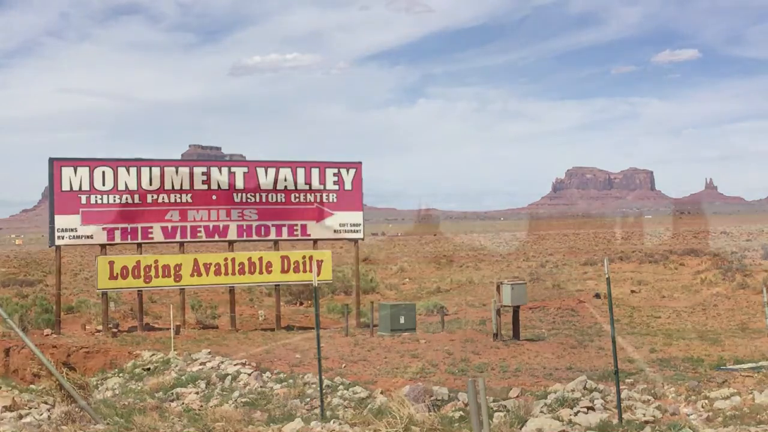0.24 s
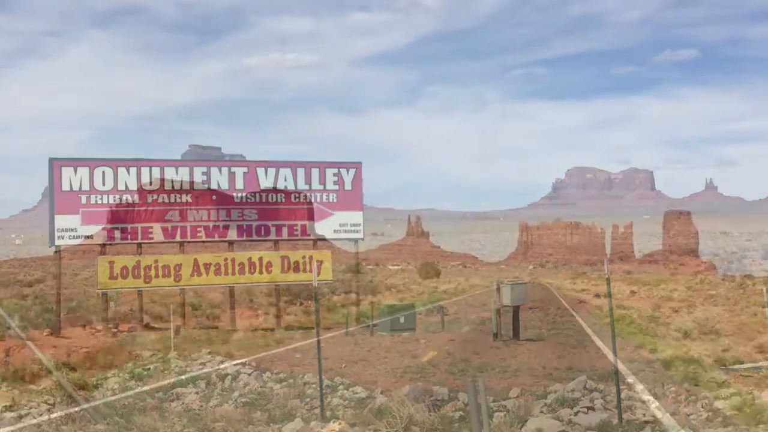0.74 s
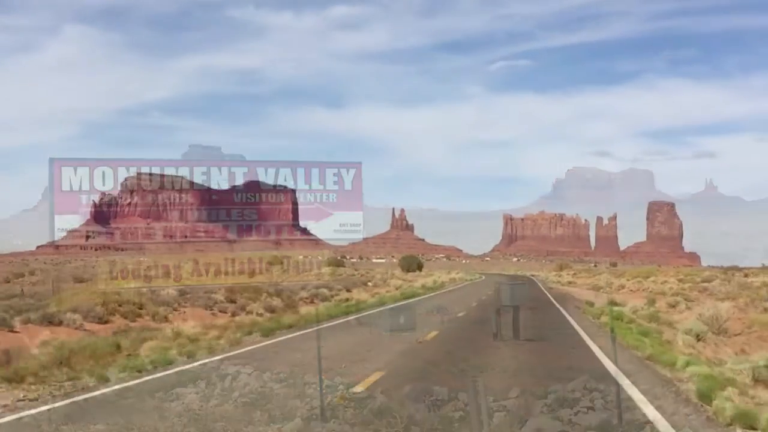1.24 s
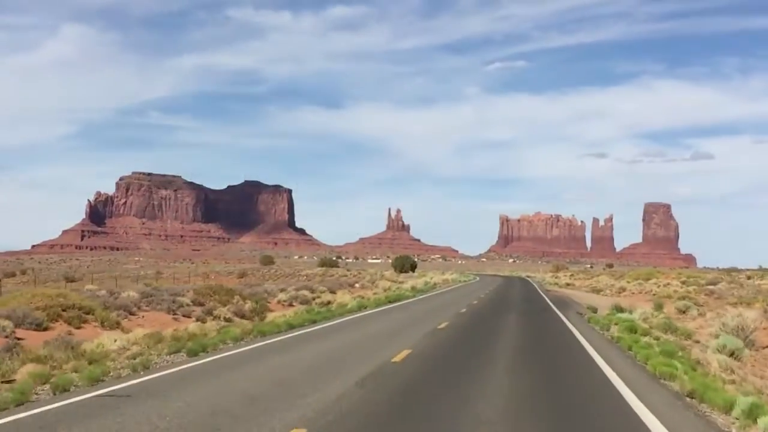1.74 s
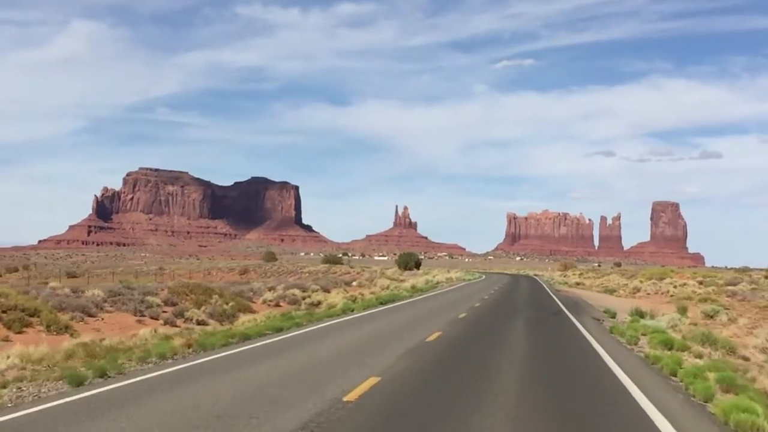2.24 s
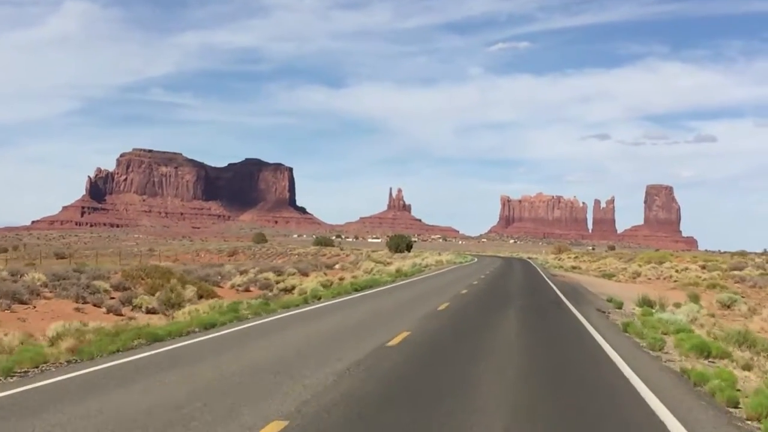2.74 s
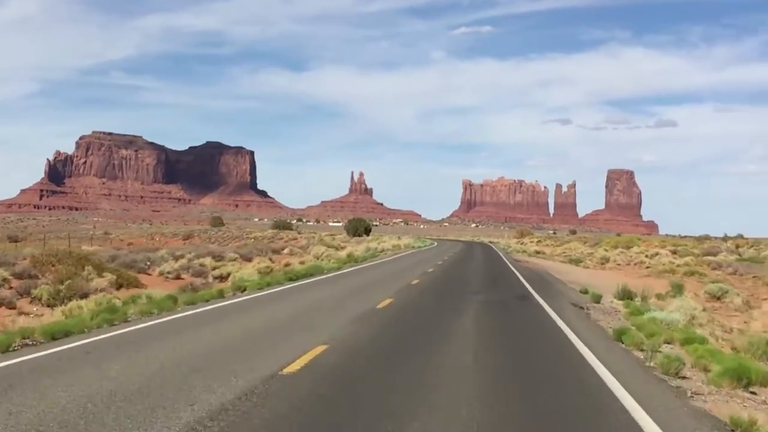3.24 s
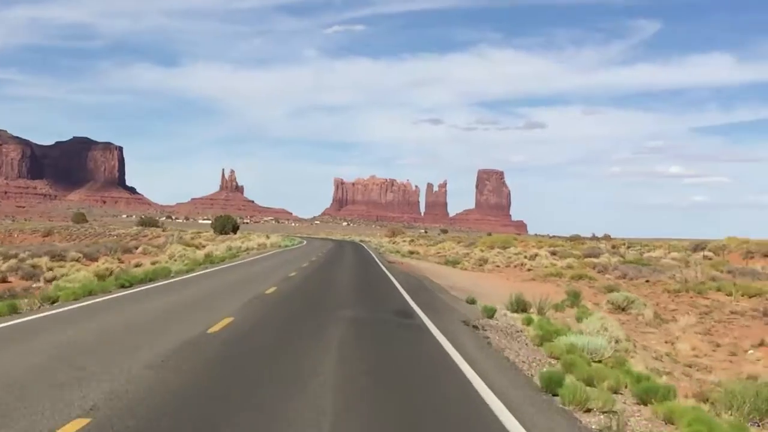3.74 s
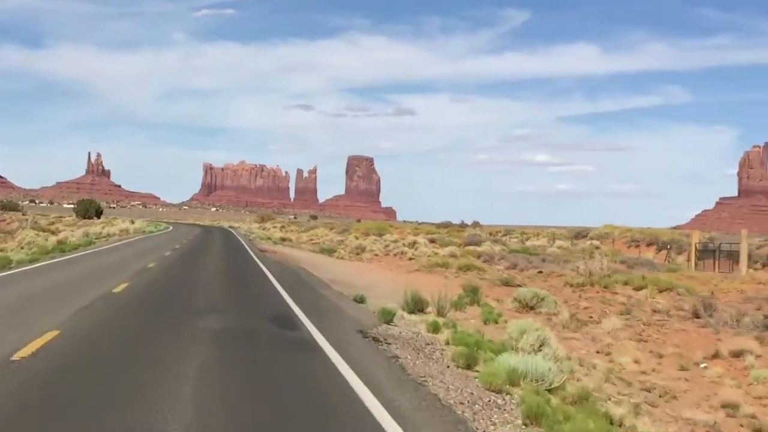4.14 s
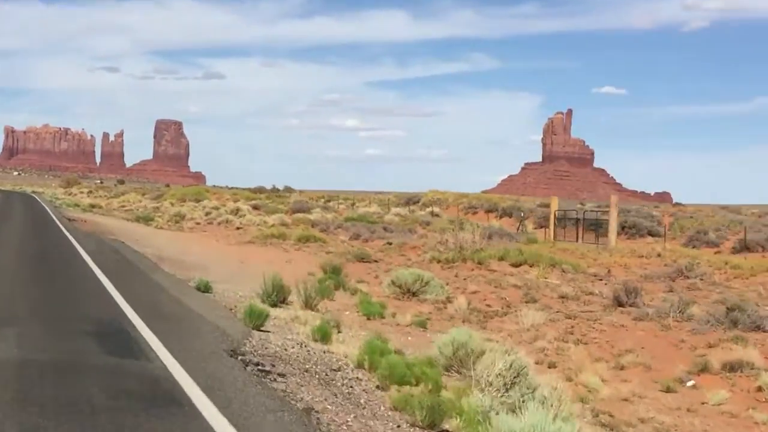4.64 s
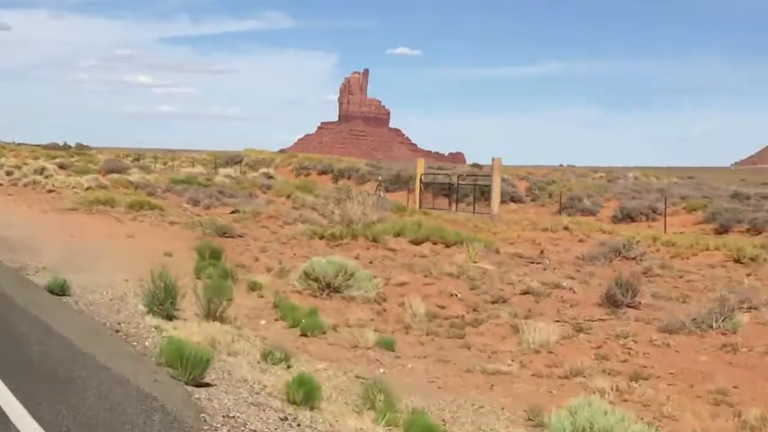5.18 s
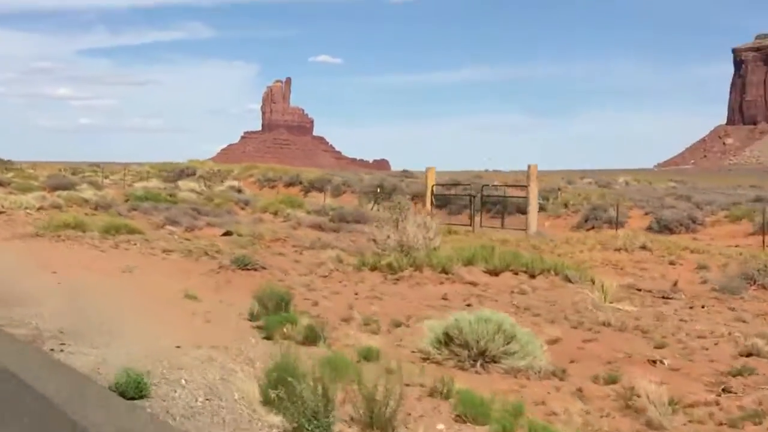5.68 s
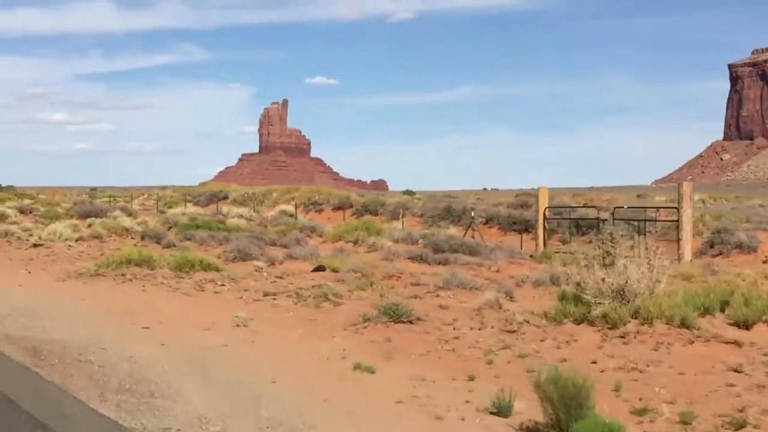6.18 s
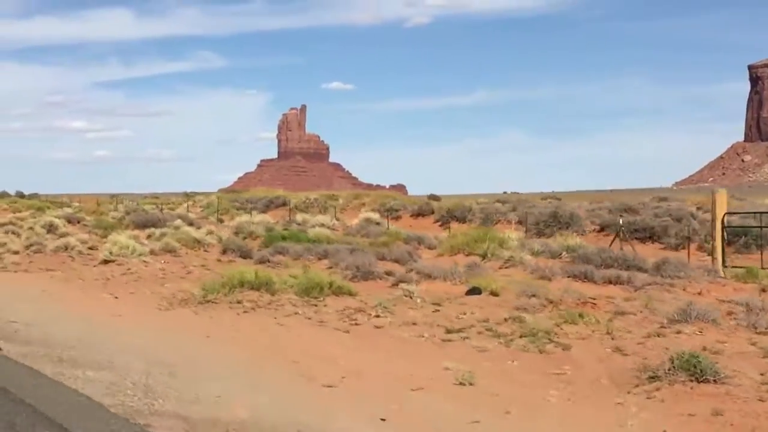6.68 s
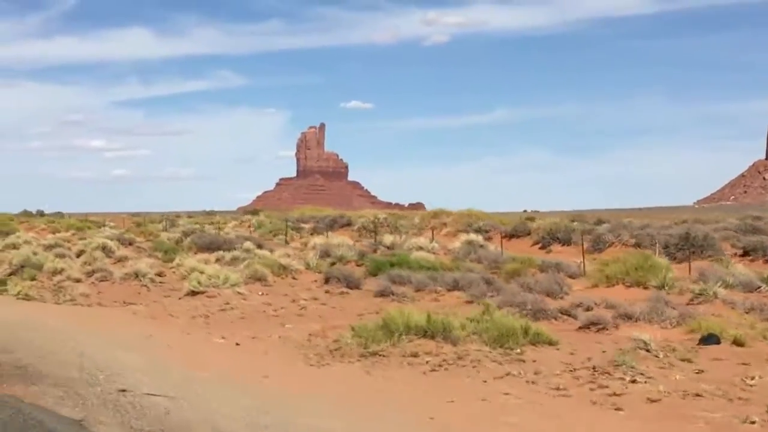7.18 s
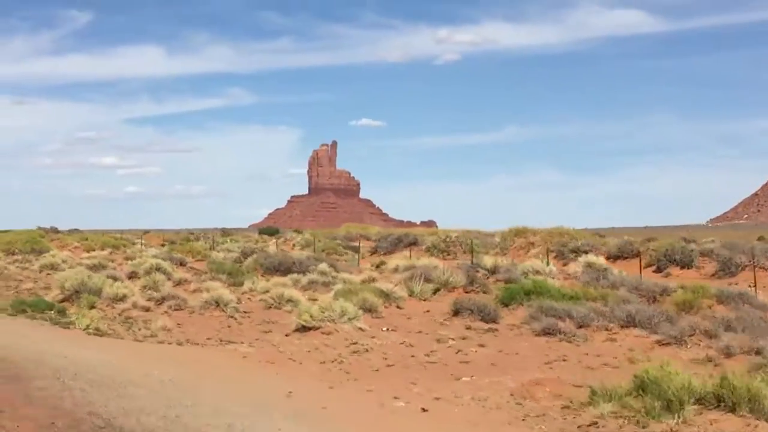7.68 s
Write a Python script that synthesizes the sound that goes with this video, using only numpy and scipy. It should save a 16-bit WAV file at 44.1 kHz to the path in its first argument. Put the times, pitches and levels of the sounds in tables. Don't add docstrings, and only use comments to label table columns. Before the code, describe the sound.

Heard from a phone held by the rider: silence, then a smooth rise of even motorcycle drone, low and pulsing, with road noise and fine metallic clatter. Small dull puffs of wind come singly. Then a sudden switch to exposed microphone; the machine sinks back, and a lumpy, crackling wind rush swells over it in irregular gusts with brief lulls. Open outdoors, no echo.

```python
import sys
import numpy as np
from scipy import signal
from scipy.fft import rfft, irfft
from scipy.io import wavfile

SR = 44100
rng = np.random.default_rng(int(sys.argv[2]) if len(sys.argv) > 2 else 0)


def unload_audio(sound):
    columns = np.transpose(np.atleast_2d(sound))
    steps = np.round(np.clip(columns, -1, 1) * 32767)
    wavfile.write(sys.argv[1], SR, steps.astype(np.int16))


def voltage_ratio(decibels):
    exponent = np.asarray(decibels, float) / 20
    return 10 ** exponent


N = 349124
START_S, FULL_S, CHANGE_S = 0.78, 1.814, 4.388


def rms_one(x):
    return x / np.sqrt(np.mean(x ** 2) + 1e-20)


def in_time(rows):
    s, *columns = np.transpose(rows)
    return [np.interp(np.arange(N) / SR, s, column) for column in columns]


def drift(rate):
    r = np.exp(-40 * np.pi * rate / SR)
    noise = rng.standard_normal(N // 20 + 4002)
    slow = signal.lfilter([1], [1, -2 * r, r * r], noise)[4000:]
    return np.interp(np.arange(N) / 20, np.arange(len(slow)), rms_one(slow))


def coloured(spectrum, pops_per_s=0, pop_db=0):
    hz, db = np.transpose(spectrum)
    grid = np.arange(1, N // 2 + 2) * SR / N
    shape = voltage_ratio(np.interp(np.log(grid), np.log(hz), db, left=-120, right=-120))
    pop_sizes = voltage_ratio(pop_db + 3.5 * np.minimum(rng.exponential(1, N), 2.5))
    pops = (rng.random(N) < pops_per_s / SR) * pop_sizes
    noise = rng.standard_normal(N) * (1 + pops)
    return rms_one(irfft(rfft(noise) * shape, N))


def patchy(x, patchy_db, rate, sway_db=0, sway_per_octave=0):
    hz, spread, out = np.arange(1, N // 2 + 2) * SR / N, rfft(x), 0
    steps = 2 * np.log2(hz / 20)
    for k in range(20):
        band = irfft(spread * np.clip(1 - abs(steps - k), 0, 1), N)
        band_sway_db = sway_db * sway_per_octave * max(k / 2 - 5.2, 0)
        out = out + band * voltage_ratio(patchy_db * drift(rate) + band_sway_db)
    return out


def bursts(events, rise_share=0.33):
    out = np.zeros(N + SR)
    for s, db, length_s in events:
        rise = int(2 * rise_share * length_s * SR)
        fall = int(2 * (1 - rise_share) * length_s * SR)
        shape = np.r_[np.hanning(2 * rise)[:rise], np.hanning(2 * fall)[fall:]]
        peak = round(s * SR)
        out[peak - rise:peak + fall] += voltage_ratio(db) * shape
    return out[:N]


def turned_phone():
    return np.clip((np.arange(N) / SR - CHANGE_S) / .012, 0, 1)


def after_change(hold_s, back_s):
    since = np.arange(N) / SR - CHANGE_S
    return np.clip(1 - (since - hold_s) / back_s, 0, 1) * turned_phone()


def throb(cycles, at, depth_db):
    return voltage_ratio(depth_db * np.cos(2 * np.pi * (cycles - at)))


def exhaust(cycles):
    # multiple of the cycle rate, level in dB.
    harmonics = [(1, -50), (2, -20), (3, -7), (4, -5), (5, 0), (6, -9), (7, -11), (8, -15), (9, -15),
                 (10, -10), (11, -22), (12, -19), (13, -32), (14, -28), (15, -29), (16, -27), (17, -36),
                 (18, -33), (19, -25), (20, -27), (21, -28)]
    second_at, second_share = .75, .6
    order, db = np.transpose(harmonics)
    firings = 1 + second_share * np.exp(-2j * np.pi * order * second_at)
    pipe = np.log(voltage_ratio(db) / abs(firings))
    mirrored = np.r_[pipe[0] - 1, pipe, pipe[::-1]]
    lag = np.angle(firings) - np.imag(signal.hilbert(mirrored))[1:len(order) + 1]
    late = cycles + .212 + .002 * drift(4)
    turn = 2.2
    tones = [voltage_ratio(d + .9 * drift(2.5)) * np.cos(2 * np.pi * k * late + p + turn)
             for k, d, p in zip(order, db, lag)]
    return np.sqrt(2) * sum(tones)


def intake(cycles):
    # multiple of the cycle rate, level in dB.
    air_box_tones = [(30, -36), (31, -25), (33, -31), (34, -29), (38, -32)]
    tones = [voltage_ratio(db + 1.6 * drift(2)) * np.cos(2 * np.pi * (k * cycles + rng.random()))
             for k, db in air_box_tones]
    return np.sqrt(2) * sum(tones)


def whine():
    pitches_hz = [600, 657, 1007, 1314, 2397, 3005, 3717, 3976, 4195, 4299, 5173, 6051, 6546, 7138, 9349,
                  12468]
    # width in Hz, level over the clatter in dB.
    resonances = [(60, -2.5), (60, 2), (25, 4.5), (15.9, 3.5), (12.1, -2.5), (25, -9.5), (30, -8), (60, -4),
                  (20, -7), (40, -12), (90, -9.5), (40, -17.5), (70, -13.5), (80, -24), (100, -21),
                  (70, -29)]
    out = 0
    for hz, (width_hz, db) in zip(pitches_hz, resonances):
        r = np.exp(-np.pi * width_hz / SR)
        a = [1, -2 * r * np.cos(2 * np.pi * hz / SR), r * r]
        once = signal.lfilter([1, 0, -1], a, rng.standard_normal(N))
        out = out + voltage_ratio(db) * rms_one(signal.lfilter([1], a, once))
    return out


def valve_clatter(cycles, turned):
    # frequency in Hz, level in dB per Hz.
    sheltered = [(1590, -22), (2700, -4.5), (3150, -4), (4190, 0), (4350, 2), (4930, -10), (5340, -6.5),
                 (6140, -12.5), (6650, -11), (6900, -11.5), (9250, -14.5), (10300, -20), (11500, -13.5),
                 (15000, -21), (15600, -14)]
    # frequency in Hz, level in dB per Hz.
    exposed = [(2710, -24), (4600, 0.5), (4840, -9), (5280, -1), (6920, -14.5), (8480, -17), (9400, -11),
               (10400, -13.5), (11600, -12), (13800, -18), (14900, -23), (15600, -27)]
    ticks = throb(2 * cycles, 0.14, 0.17) * throb(4 * cycles, 0.43, 0.53) * throb(cycles, 0.22, 0.16)
    after = voltage_ratio(-5.0) * coloured(exposed) + voltage_ratio(-5.0) * coloured(sheltered[:6])
    colour = turned * after + (1 - turned) * coloured(sheltered)
    return voltage_ratio(12) * ticks * patchy(colour, patchy_db=1.5, rate=15) + voltage_ratio(6) * whine()


def machine():
    # time in seconds, engine cycles per second.
    engine_speed = [
        (0, 19.235),
        (3.3, 19.344),
        (4.39, 19.337),
        (4.4, 19.26),
        (6.1, 19.212),
        (7.2, 19.056),
        (7.92, 19.046),
    ]
    # time in seconds, level in dB.
    throttle = [(.78, 1.5), (1.6, 0.5), (1.9, 0.5), (3.0, 0.9), (3.3, 3.5), (3.7, 1.5), (4.1, 1), (5.3, 0),
                (5.9, 2), (6.4, -1.8), (7.0, 0.3), (7.4, 0.3), (7.9, 0)]
    # frequency in Hz, level in dB per Hz.
    uneven_burn = [(20, -70), (40, -23), (60, 11.5), (100, 0), (150, 2.5), (195, -6), (225, -21),
                   (300, -36), (450, -53)]
    # frequency in Hz, level in dB per Hz.
    road_noise = [(130, -16.5), (220, -1.5), (269, -11.5), (446, -14), (596, -11.5), (834, -18),
                  (1290, -15.5), (1490, -19.5), (2390, -28), (2620, -36), (3200, -61), (4160, -50),
                  (7040, -120)]
    (speed,), (load_db,) = in_time(engine_speed), in_time(throttle)
    cycles = .493 + np.cumsum(speed) / SR
    turned = turned_phone()

    rough = voltage_ratio(-9) * throb(cycles, 0, 5) * patchy(coloured(uneven_burn), patchy_db=2.5, rate=4)
    roar = throb(2 * cycles, 0.56, 1.35) * patchy(coloured(road_noise), patchy_db=1.0, rate=8.9)
    clatter = valve_clatter(cycles, turned)
    pulses = throb(cycles, 0.059, 0.4) * voltage_ratio(1.17 * drift(12)) * exhaust(cycles)

    dip_db = 10.5 * after_change(hold_s=0.12, back_s=0.65)
    swing_s, swing_db_per_s = 3.35, 3.5
    swing_db = swing_db_per_s * np.maximum(np.arange(N) / SR - swing_s, 0)
    away_db = dip_db + (1 - turned) * swing_db
    exhaust_db = np.interp(turned, [0, 1], [-18.5, -24.5]) + load_db - dip_db
    roar_db = np.interp(turned, [0, 1], [-29, -37.5]) - away_db
    clatter_db = np.interp(turned, [0, 1], [-56, -68.5]) - away_db
    engine = voltage_ratio(exhaust_db) * (pulses + intake(cycles) + rough)
    return engine + voltage_ratio(roar_db) * roar + voltage_ratio(clatter_db) * clatter


def stray_eddies():
    # time in seconds, peak level in dB, length in seconds, centre frequency in Hz.
    swirls = [(1.344, -13.5, 0.0096, 343), (2.174, -24, 0.028, 250), (2.79, -15, 0.0093, 395),
              (2.863, -24, 0.033, 700), (3.022, -10, 0.023, 185), (3.24, -18.5, 0.027, 250),
              (3.623, -17.5, 0.009, 300), (3.675, -10, 0.0055, 320), (3.971, -15.5, 0.0054, 540),
              (4.018, -20, 0.018, 300), (4.089, -27, 0.022, 280)]
    out = 0
    for s, db, length_s, hz in swirls:
        noise = coloured([(hz / 3, -20), (hz * .8, 0), (hz * 1.3, -2), (hz * 2.5, -11), (hz * 6, -34)])
        puff = noise * bursts([(s, 0, length_s)], rise_share=0.22)
        out = out + voltage_ratio(db) * puff / abs(puff).max()
    return out


def shed_eddies():
    per_s, level_db, spread_db, length_s = 55, 0, 1.5, 0.0084
    chance = rng.random((400, 3))
    times = CHANGE_S + np.cumsum(.4 + 1.2 * chance[:, 0]) / per_s
    return bursts([(s, level_db + spread_db * 2 * (size - .5), length_s * (.5 + long))
                   for s, (_, size, long) in zip(times, chance) if s < N / SR - .03])


def wind_push(gust_db):
    # time in seconds, level in dB, length in seconds.
    puffs = [(4.787, -23.5, .013), (4.842, -20.5, 0.024), (4.885, -20, .04), (4.937, -20.5, 0.0093),
             (4.992, -28, 0.054), (5.083, -20, .012), (5.118, -21, 0.022), (5.325, -24, 0.02),
             (5.574, -21.5, 0.013), (5.642, -33.5, .019), (5.843, -27, 0.0088), (5.917, -20.5, 0.031),
             (5.966, -19.5, .009), (6.037, -18, 0.0042), (6.084, -17.5, .013), (6.141, -17, 0.0062),
             (6.208, -27, 0.024), (6.67, -21.5, 0.015), (6.747, -20, 0.007), (6.845, -15.5, .04),
             (6.948, -20, 0.014), (7.048, -19, 0.014), (7.103, -19, 0.035), (7.128, -22.5, 0.029),
             (7.226, -24.5, .013), (7.45, -19, .013), (7.643, -18, 0.0087), (7.673, -22.5, 0.013),
             (7.736, -18.5, 0.023), (7.912, -21.5, 0.011)]
    # time in seconds, peak level in dB.
    edge_snaps = [(5.159, -17.5), (5.302, -14.5), (5.353, -13), (5.516, -15.5), (5.548, -15), (5.669, -16),
                  (5.713, -20), (6.011, -20), (6.26, -12), (6.289, -15), (6.377, -20.5), (6.45, -19),
                  (6.526, -15.5), (6.563, -14.5), (6.586, -16), (6.64, -14.5), (6.803, -17), (6.913, -16),
                  (7.469, -17.5), (7.782, -20), (7.831, -15.5)]
    # time in seconds, depth in dB, length in seconds.
    lulls = [
        (5.148, -2, 0.01),
        (5.205, -19, .012),
        (5.745, -5, 0.02),
        (5.948, 0, 0.018),
        (6.0, -2, 0.018),
        (6.495, 4.5, .015),
        (7.005, -6, 0.0093),
        (7.885, 0, 0.012),
    ]
    snap_s, snap_rise_s, snap_db = 0.0071, 0.0038, -6
    stream = voltage_ratio(gust_db) * (voltage_ratio(-2.5) + shed_eddies() * (1 - after_change(0.27, 0.3)))
    snaps = bursts([(s + snap_rise_s, db + snap_db, snap_s) for s, db in edge_snaps], rise_share=0.34)
    push = np.hypot(stream, voltage_ratio(1.0) * bursts(puffs, rise_share=0.32) + snaps)
    return push * (1 - np.minimum(bursts(lulls), .85))


def wind():
    # time in seconds, level in dB.
    gusts = [(4.39, -29), (4.74, -27), (4.88, -25.5), (5.17, -32.5), (5.36, -24.5), (5.41, -32),
             (5.62, -26.5), (5.76, -30.5), (5.88, -23), (6.28, -25), (6.34, -31.5), (6.79, -31),
             (6.9, -23.5), (7.12, -27), (7.18, -32.5), (7.6, -27.5), (7.72, -26.5), (7.9, -29.5)]
    # frequency in Hz, level in dB per Hz.
    rush_colour = [(150, 6), (250, 1.5), (524, 0), (1080, -5), (2140, -22), (4010, -45), (4820, -58.5),
                   (5250, -58.5), (7500, -74), (9750, -100), (16500, -120)]
    # frequency in Hz, level in dB per Hz.
    buffet_colour = [(20, -41), (40, -3), (80, -2), (200, -4.5), (350, -7), (600, -30.5)]
    gust_db, = in_time(gusts)
    push = wind_push(gust_db)
    crackle = voltage_ratio(1.09 * drift(47) + 1.68 * drift(600))
    eddies = coloured(rush_colour, pops_per_s=900, pop_db=9)
    lowered_db = 10.5 * after_change(hold_s=0, back_s=0.62)
    strength_db = np.clip(20 * np.log10(push * crackle) + 30 + lowered_db, -20, 20)
    rush = push * crackle * patchy(eddies, 1.37, 22, sway_db=strength_db, sway_per_octave=0.4)

    lumps_db = 3 * drift(20) + .2 * strength_db
    follow_db = 0.39 * (gust_db + 25.5)
    buffet_db = -23 + follow_db + 1.8 * drift(5) - 14 * after_change(0.12, 0.3)
    buffet = voltage_ratio(buffet_db - 0.5 + lumps_db) * patchy(coloured(buffet_colour), patchy_db=0.0, rate=4.0)
    return (rush + buffet) * turned_phone()


def scene():
    fade = np.clip((np.arange(N) / SR - START_S) / (FULL_S - START_S), 0, 1)
    return (fade ** 1.03 * (machine() + wind() + stray_eddies()))[None]


def roll_off(x):
    return signal.sosfilt(signal.butter(12, 15720, fs=SR, output="sos"), x)


def record(dry):
    top = .62
    mix = top * np.tanh(0.89 * dry / top)
    return roll_off(mix)


dry = scene()
out = record(dry)
unload_audio(out)
```